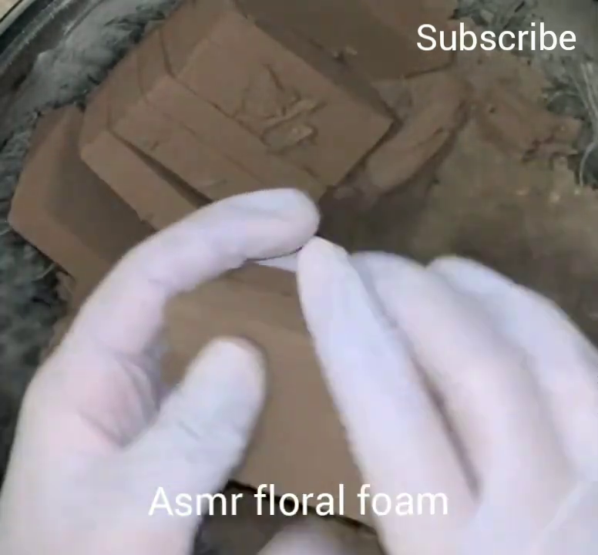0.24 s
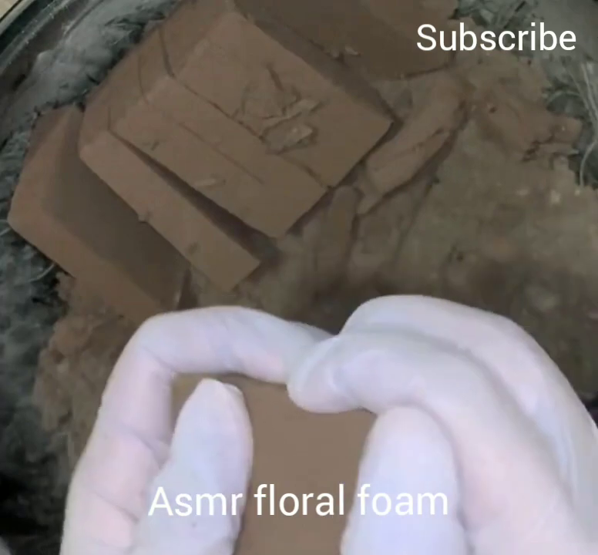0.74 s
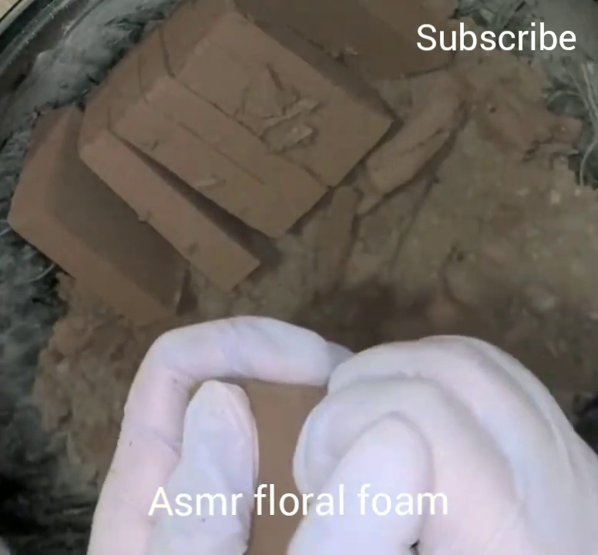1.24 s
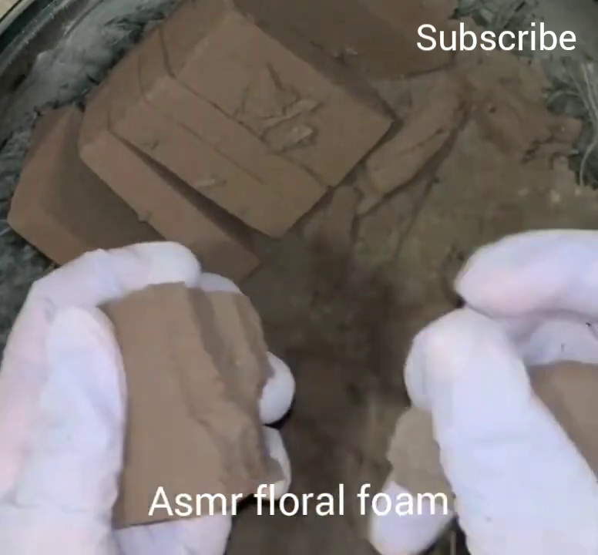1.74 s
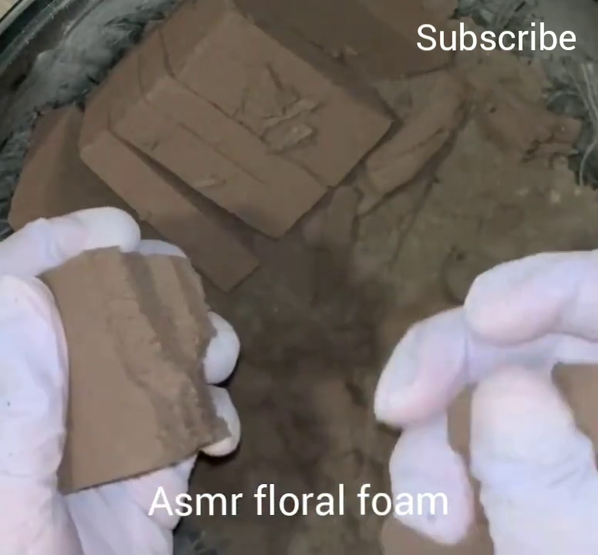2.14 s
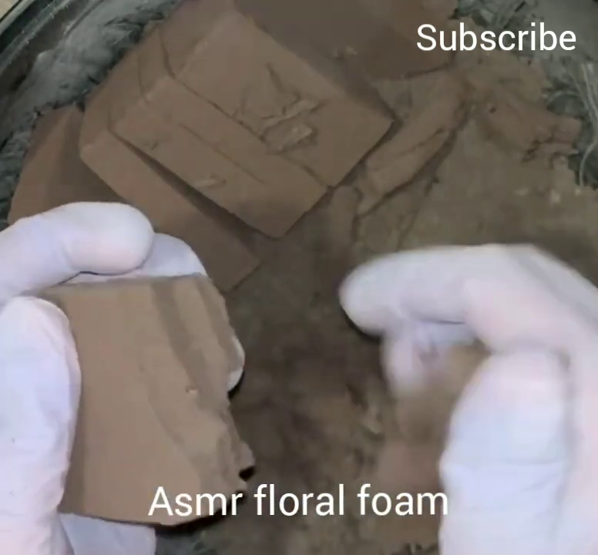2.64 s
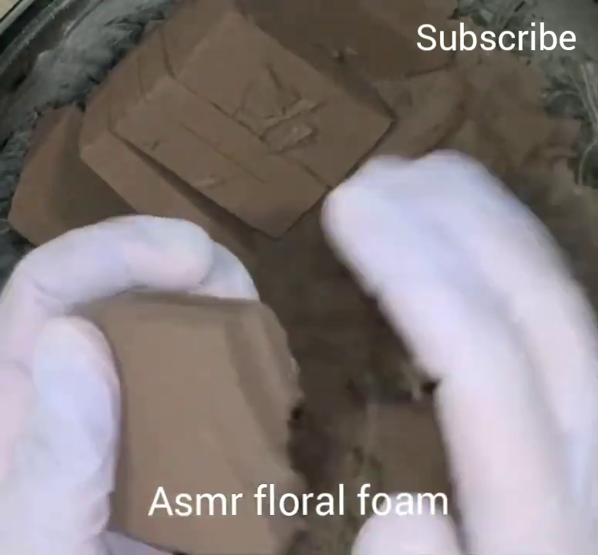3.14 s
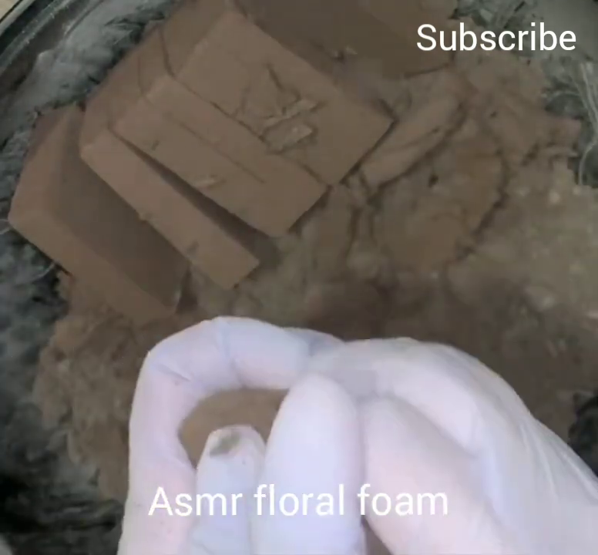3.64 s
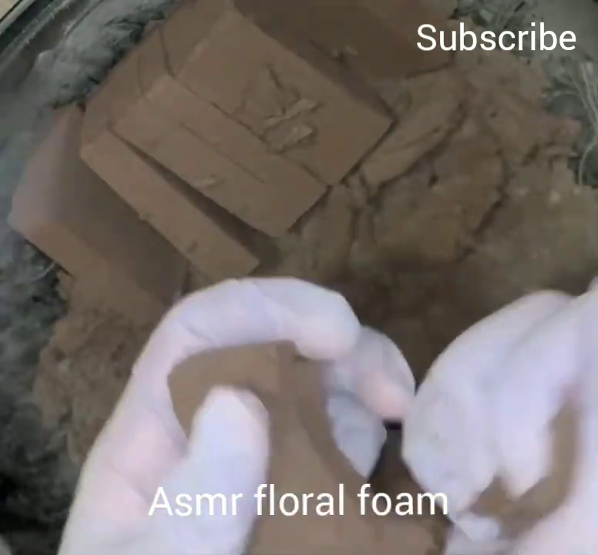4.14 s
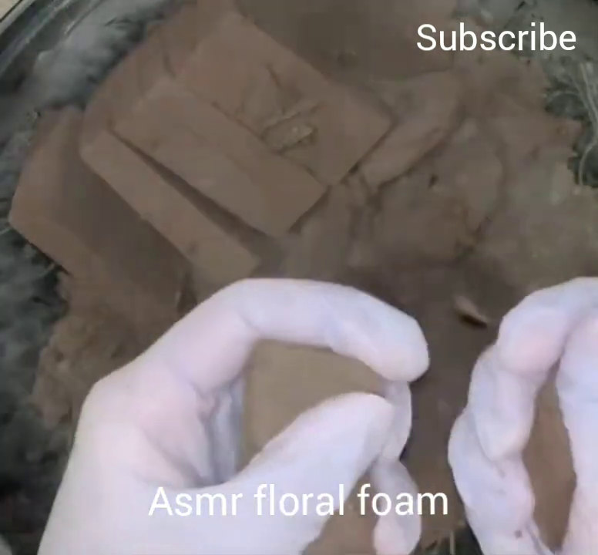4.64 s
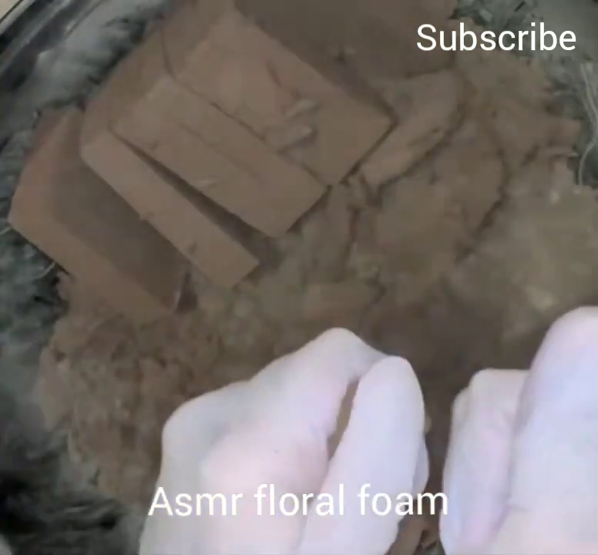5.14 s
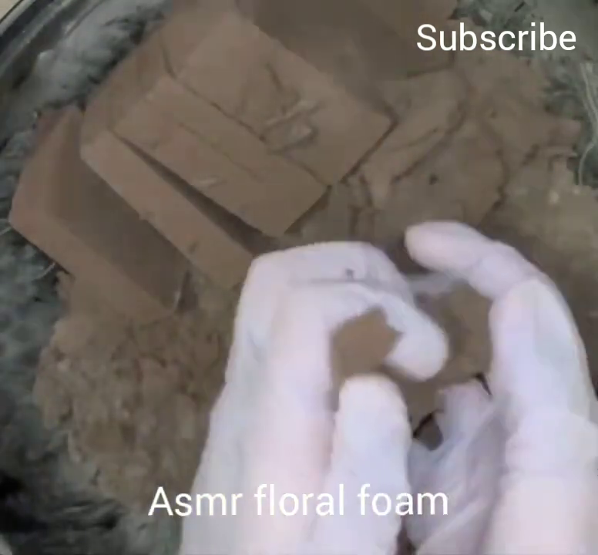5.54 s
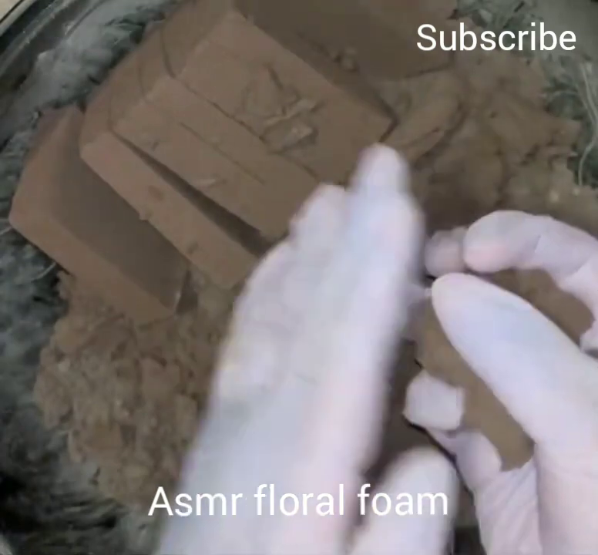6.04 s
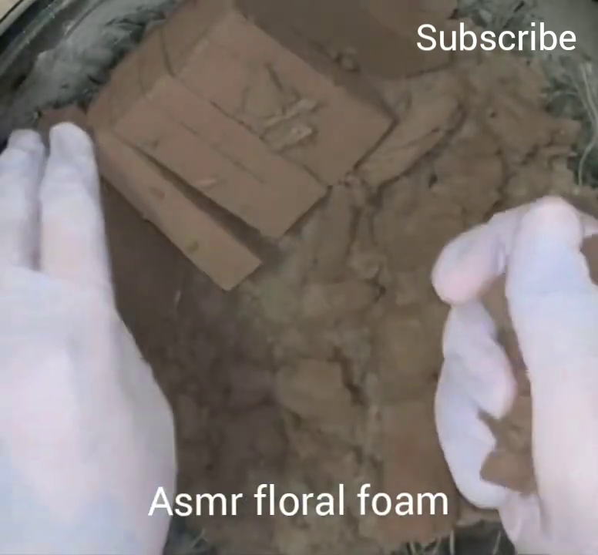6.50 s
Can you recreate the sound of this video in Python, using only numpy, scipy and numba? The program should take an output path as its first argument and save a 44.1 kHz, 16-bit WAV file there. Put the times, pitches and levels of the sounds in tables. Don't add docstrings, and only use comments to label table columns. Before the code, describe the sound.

Thousands of tiny brittle cell walls burst as fingers squeeze foam blocks on a table, making a gritty, hissy, wide crackle. Sharp bright snaps and dull knocks of breaking, dropping chunks poke through. Strong crunches come early, a short gap falls before the middle, then harder distorted crunches follow, easing into sparse rustling and a final squeeze. Close, dry indoor sound with soft low thumps and a distant motor.

```python
import sys
import numpy as np
from scipy import signal
from scipy.fft import rfft, irfft
from scipy.io import wavfile
from scipy.ndimage import uniform_filter1d
from numba import njit

SR = 44100
rng = np.random.default_rng(int(sys.argv[2]) if len(sys.argv) > 2 else 0)


def generate_wav(signal):
    frames = np.transpose(np.atleast_2d(signal))
    scaled = np.clip(frames, -1, 1) * 32767
    pcm = np.round(scaled).astype(np.int16)
    wavfile.write(sys.argv[1], SR, pcm)


def boost_factor(decibels):
    exponent = np.asarray(decibels, float) / 20
    return 10 ** exponent


N = 298557


def cells(count=120000):
    place, pitch, luck = rng.random((3, count))
    at = place * (N - 1)
    now = at.astype(int)
    hz = 150 * (17000 / 150) ** (pitch ** .55)
    t60 = np.clip(16 * boost_factor(3.5 * rng.standard_normal(count)), 5, 40) / hz
    crowd = pitch ** .45 + .02
    burst_db = np.minimum(-1.8 * np.log(1 - luck), 9)
    size = boost_factor(burst_db) * np.sqrt(hz / crowd / t60)
    patches = np.array([walk(10) for _ in range(42)])
    band = (6 * np.log2(hz / 150)).astype(int)
    lean_db = grip_db(at, hz) + 1.6 * patches[band, now]
    effort = np.sqrt(presses()[0] * boost_factor(1.1 * walk(22.34)) ** 2 + slips())
    even_crackle = foam_colour(rings(at, hz, t60, size))
    scale = boost_factor(2.5) / np.sqrt(np.mean(even_crackle ** 2))
    played = scale * size * boost_factor(lean_db) * effort[now]
    return foam_colour(at_ports(at, hz, t60, played, spread=.35, late_s=.004, wet_db=-1.))


# t/s of the peak, level/dB, swell/(ms
# per 20 dB), fade/(ms per 20 dB), crunch depth/dB
PRESSES = [(0.014, -17.0, 72.5, 61.5, -2), (0.699, -16.5, 128.5, 361, 5), (0.828, -10.5, 211, 308.5, 3.5),
           (0.935, -14.5, 260.0, 240.5, 8), (1.048, -12, 338.5, 30.0, 2.0), (1.168, -6.0, 473, 90.5, 2),
           (1.253, -15.5, 90.0, 68.5, -2.5), (1.721, -18, 300.5, 70.0, 3.5),
           (1.966, -13, 343.5, 39.5, -2.5), (2.03, -13.5, 150, 251, 0.5), (2.1, -15.5, 199.5, 201, -3.5),
           (2.18, -18, 199.5, 92, 3), (2.288, -19, 73, 171, -0.5), (3.216, -14, 47.5, 51.5, -9),
           (3.347, -9.5, 161.5, 317.5, 3.5), (3.459, -5, 234.5, 84, 3.5), (3.633, -8.5, 289.5, 92.5, 2.0),
           (3.932, -15.5, 255.5, 25.5, 0.5), (4.531, -5.5, 361.5, 243, -1), (4.693, -8, 162, 335.5, -3),
           (4.922, -13.5, 182, 176.5, 4.5), (6.075, -17.5, 161.5, 329, 2.5),
           (6.232, -14.0, 359, 190.0, 0.5), (6.447, -15.5, 278.5, 129.5, -0.5),
           (0.057, -20.5, 301, 59, 0), (0.187, -26, 168, 140.5, -4), (0.266, -22.5, 81, 68.5, -0.5),
        (0.331, -22.5, 160.5, 157, -1.5), (0.477, -25.5, 27.5, 790.0, -3.5), (0.546, -22.0, 70.0, 692, -3),
        (1.337, -24, 98.5, 26, 4.5), (1.518, -24.0, 229, 90.0, 3), (2.404, -27, 29.5, 361.5, -1),
        (2.64, -25.5, 87.5, 132.5, 0), (3.018, -23.5, 153, 80.0, 0), (3.138, -19, 46.5, 56, -4),
        (4.086, -23.5, 140.0, 30.0, -3), (4.189, -25.5, 93.5, 150.5, -2), (5.093, -26.5, 780.0, 73.5, 10.5),
        (5.326, -26, 135, 148.5, 4.5), (5.542, -27.5, 542, 35.5, 3), (5.726, -24, 450.0, 241, -1.5),
        (5.95, -25, 60.0, 48, 5), (6.598, -23.5, 59, 259.5, 3.0), (6.753, -20.5, 89, 90.0, 1.5)]
RUSTLE_DB = -54.5


def presses():
    s, db, swell, fade, depth = np.array(PRESSES).T[:, :, None]
    t = np.arange(0, N + 64, 64) / SR
    slope_ms = np.maximum(np.where(t < s, swell, fade), 15)
    each = boost_factor(db - 20 * 1000 * np.abs(t - s) / slope_ms) ** 2
    each = uniform_filter1d(each, 8)
    power = each.sum(axis=0) + boost_factor(RUSTLE_DB) ** 2
    mean_depth = (each * depth).sum(axis=0) / power
    return [np.interp(np.arange(N) / SR, t, v) for v in (power, mean_depth)]


# t/s, level/dB
SLIPS = [(0.477, -8.5), (0.5173, -2.5), (0.6157, -2), (0.6519, -4.5), (0.7214, 3.5), (0.7512, -0.5),
         (0.9024, 9.5), (1.4202, -10.5), (1.501, -11.5), (1.6521, -13.5), (1.698, -8.5), (2.2792, -7),
         (2.5596, -18), (2.9547, -18.5), (2.9956, -5), (3.1033, -10), (3.121, -5), (3.5606, 9),
         (3.6164, 18), (4.306, -5), (4.3518, 4.5), (4.8903, 12), (4.9422, 1.5), (5.1721, -14.5),
         (5.238, -12), (5.438, -8), (5.501, -7.5), (6.0337, 3.5), (6.2257, 0.5), (6.7321, -10.5)]
SLIP_T60_S = 0.052


def slips():
    power = np.zeros(N)
    for s, db in SLIPS:
        start = int(s * SR)
        t = np.arange(N - start)[:SR // 4] / SR
        shape = (1 - np.exp(-t / 0.0026)) * np.exp(-2 * np.log(1000) * t / SLIP_T60_S)
        power[start:][:len(t)] += boost_factor(db - 10.5) ** 2 * shape
    return power


COARSE_PER_DB, CRUNCH_PER_DB, THUD_PER_DB, THUD_LAG_PER_DB, USUAL_DB = 0.44, 1.34, 1.43, -0.22, -25.5


def grip_db(at, hz):
    power, depth = (v[at.astype(int)] for v in presses())
    coarse, crunch = COARSE_PER_DB * depth, CRUNCH_PER_DB * depth
    thud = THUD_PER_DB * depth + THUD_LAG_PER_DB * (10 * np.log10(power) - USUAL_DB)

    def below(edge_hz):
        return np.clip(2 * np.log2(edge_hz / hz) + .5, 0, 1)

    return below(6200) * coarse + below(2900) * (crunch - coarse) + below(1050) * (thud - crunch)


# f/Hz, level/(dB per Hz)
CELLS = [(88, -37.5), (150, -8), (290, -4.5), (480, -9), (860, -7), (1080, -14.5), (1570, -5), (2060, -6),
         (2400, -1), (2860, -3.5), (4930, 0.5), (5430, -2), (7550, 1), (8990, 0), (15500, 0.5)]
# f/Hz, width/Hz, level/dB
HOLLOWS = [(1584, 110, 3.5), (2260, 420, 1), (4050, 89, 7.5), (5060, 130, 3.5), (7150, 400, 1.5),
           (8870, 630, 5), (10170, 390, 2), (12400, 590, -2)]


def foam_colour(x):
    hz = np.fft.rfftfreq(N, 1 / SR) + 1
    peaks_db = sum(db / (1 + (2 * (hz - f) / width) ** 2) for f, width, db in HOLLOWS)
    return irfft(rfft(x) * boost_factor(along(CELLS, hz) + peaks_db), N)


# t/s, level/dB
SNAPS = [(0.0586, -10.5), (0.1547, -16), (0.4758, -15), (0.5641, -7), (0.6191, -7), (1.2578, 0.5),
         (1.4365, -12.5), (1.6531, 0.5), (1.7608, 1), (1.816, -9), (1.8882, 1.5), (1.9207, -6),
         (2.2823, -2.5), (2.3198, -11.5), (2.6344, -15), (3.7134, -5.5), (4.0367, -8.5), (4.2834, -7),
         (5.0053, -1), (5.1328, -15), (5.3194, -18.5), (5.4399, -11.5), (5.6872, -13), (5.7622, -6.5),
         (6.035, -0.5), (6.0817, -3), (6.1487, -6), (6.353, -11), (6.4158, -3), (6.5785, -12.5)]


def snaps():
    s, db = np.repeat(SNAPS, 4, axis=0).T
    hz = np.tile([3200., 5500., 8800., 13000.], len(SNAPS)) * boost_factor(1.2 * rng.standard_normal(len(s)))
    size = boost_factor(db - 10 - 3 * (hz > 10000))
    return at_ports(s * SR, np.minimum(hz, 15000), 4.5 / hz, size, spread=.2, late_s=.002, wet_db=-6.)


# t/s, level/dB, f/Hz, t60/s
KNOCKS = [(0.02, -16, 593, 0.07), (0.472, -23, 509, 0.018), (0.618, -20, 680, 0.035),
          (0.652, -17.5, 753, 0.053), (0.84, -11, 578, 0.03), (0.903, -4.5, 1520, 0.03),
          (0.992, -8.5, 818, 0.023), (1.043, -11.5, 884, 0.056), (1.103, -10, 533, 0.071),
          (1.149, -25, 1457, 0.024), (1.333, -8.5, 668, 0.026), (1.525, -31, 418, 0.027),
          (1.695, -14.5, 740, 0.047), (2.197, -15.5, 500, 0.068), (2.948, -40.5, 493, 0.036),
          (3.275, -16, 867, 0.034), (3.565, -18, 1324, 0.025), (3.607, -9, 393, 0.071),
          (4.275, -22, 401, 0.018), (4.443, -28, 1490, 0.027), (4.512, -19.5, 528, 0.025),
          (4.534, -9.5, 633, 0.086), (4.69, -7.5, 406, 0.042), (4.89, -12.5, 404, 0.024),
          (5.081, -11.5, 544, 0.042), (5.457, -19.5, 1310, 0.041), (5.686, -19.5, 610, 0.022),
          (5.736, -32, 401, 0.026), (6.031, -18.5, 1040, 0.045), (6.363, -30, 447, 0.042)]


def knocks():
    s, db, hz, t60 = np.repeat(KNOCKS, 6, axis=0).T
    ratio = np.tile([1., .6, 1.9, 2.2, 4.0, 1.3], len(KNOCKS))
    part_db = np.tile([0, -4, -1, -1, -4, -11], len(KNOCKS))
    after_s = np.tile([0, .0003, .0002, .0001, .0004, .009], len(KNOCKS))
    at = (s + after_s) * SR
    part_t60 = np.maximum(t60, .003) * .22 / ratio
    return at_ports(at, hz * ratio, part_t60, boost_factor(db + part_db - 6), spread=.5, late_s=.006, wet_db=-8.)


# t/s, drawn right/(0-1), extra scatter level/dB while they cup the block
HANDS = [(0, 0.6, 2), (.45, 0.4, 2), (.7, .1, 7.5), (1.25, 0.2, 1.5), (1.45, 0, 1.5), (2.35, -.1, -0.5),
         (2.6, 0.9, 4), (3.05, 0.4, 0.5), (3.4, 0, 5), (3.75, 0, 9.5), (4.2, 0.4, 2.5), (4.6, 0.4, 1.5),
         (5.0, -.1, -1), (5.25, .3, 4.5), (5.8, 1, 1), (6.3, 1.1, -1), (6.77, 1.2, 1)]
# f/Hz, left lead/samples with hands at the block, left lead/samples with hands drawn right
PORTS = [(300, 2, 3), (700, 2, 2), (1030, 6, 4), (1400, 10.7, 9.7), (2100, 10.2, 7.8), (2750, 9.4, 7.4),
         (3300, 11, 5.8), (4100, 9.8, 7), (5200, 8.5, 6.4), (6700, 6.7, 6.5), (7600, 8.7, 7.9),
         (10000, 8.3, 7), (13000, 7, 6.7), (14000, 8, 7.5)]
# f/Hz, level/dB over the straight path
SCATTER = [(200, -7), (700, -6), (1400, -7), (2100, -7), (2500, -3.5), (2950, -5), (3500, -2.5), (7000, -3),
           (12000, -1)]


def at_ports(at, hz, t60, size, spread, late_s, wet_db):
    s, *place = np.transpose(HANDS)
    drawn, cupped_db = (np.interp(at / SR, s, v) for v in place)
    chance = rng.standard_normal((2, len(at)))
    wait = late_s * SR * rng.exponential(size=(2, len(at)))
    lead = (1 - drawn) * along(PORTS, hz) + drawn * along(PORTS, hz, column=2) + spread * chance[0]
    pan = boost_factor(-0.35 + 1.54 * chance[1])
    patches = np.array([walk(16) for _ in range(32)])
    band = np.clip(4 * np.log2(hz / 100), 0, 31).astype(int)
    bounce = boost_factor(along(SCATTER, hz) + wet_db + cupped_db + 4.0 * patches[band, at.astype(int)])
    straight = size / np.sqrt(1 + bounce ** 2)
    left = rings(at, hz, t60, straight * pan) + rings(at + wait[0], hz, t60, straight * bounce * pan)
    right = rings(at + lead, hz, t60, straight / pan) + rings(at + wait[1], hz, t60, straight * bounce / pan)
    return np.array([left, right])


@njit
def rings(at, hz, t60, size):
    out = np.zeros(N)
    for g in range(len(at)):
        rate = np.log(1000) / t60[g] / SR
        s = 2j * np.pi * hz[g] / SR - rate
        first = int(np.ceil(at[g]))
        z = size[g] * np.e * rate * np.exp(s * (first - at[g]))
        turn = np.exp(s)
        for k in range(max(first, 0), min(N, first + int(t60[g] * SR * 1.2) + 1)):
            out[k] += z.imag * (k - at[g])
            z *= turn
    return out


def along(table, hz, column=1):
    table = np.array(table)
    return np.interp(np.log(hz), np.log(table[:, 0]), table[:, column])


def walk(rate):
    k = int(SR / rate)
    held = np.repeat(rng.standard_normal(N // k + 1), k)
    return 1.218 * uniform_filter1d(uniform_filter1d(held, k), k)[:N]


# f/Hz, level/(dB per Hz)
ROOM = [(12, -40), (20, -20.5), (59, -2), (146, -3), (242, 1.5), (323, -2), (380, -7), (424, -3.5),
        (857, -15), (1050, -45), (1500, -14.5), (1950, -45.5), (3300, -120)]
ROOM_DB = -41
# f/Hz, level/dB rms
MOTOR = [(62, -50), (124, -51.5), (186, -49.5), (247.6, -43), (371.4, -46)]


def room():
    hz = np.fft.rfftfreq(N, 1 / SR) + 1
    t = np.arange(N) / SR
    mid, side = irfft(rfft(rng.standard_normal((2, N))) * boost_factor(along(ROOM, hz)), N)
    rumble = unit(mid + .38 * side * np.array([[1], [-1]]))
    deep = irfft(rfft(rumble) / (1 + (hz / 170) ** 6), N)
    flutter = boost_factor(3.0 * walk(6))
    rumble = flutter * (rumble - deep) + sway() * deep
    drift = np.cumsum(0.00622 * walk(4)) / SR
    hum = np.zeros(N)
    for f, db in MOTOR:
        hum += np.sqrt(2) * boost_factor(db + 1.2 * walk(8)) * np.sin(2 * np.pi * f * (t + drift))
    return boost_factor(ROOM_DB + 2.5) * rumble + hum


def unit(x):
    return x / np.sqrt(np.mean(x ** 2))


# t/s, level/dB over rest, width/s
SWELLS = [(.02, 9.5, 0.057), (.66, 5, .1), (1.08, 9.5, .12), (1.98, 2, .05), (2.2, 9, .04), (3.25, -11, .1),
          (4.15, -5, .15), (4.75, -14, .1), (5.0, 12, 0.11), (5.7, 5, .1), (6.05, -8, .08), (6.25, 5, .08),
          (6.5, 10.5, 0.21)]
SWAY_REST_DB, SWAY_PRESS_DB, SWAY_SLEW_S = 0, 16.5, 0.042


def sway():
    t = np.arange(N) / SR
    pressed = uniform_filter1d(presses()[0], int(SWAY_SLEW_S * SR)) * boost_factor(SWAY_PRESS_DB) ** 2
    swell_db = sum(db * np.exp(-((t - s) / width) ** 2) for s, db, width in SWELLS)
    return np.sqrt(boost_factor(SWAY_REST_DB + swell_db) ** 2 + pressed)


def scene():
    return cells() + snaps() + knocks() + room()


def roll_off(x):
    return signal.sosfilt(signal.butter(12, 15620, fs=SR, output="sos"), x)


CUT_S, RESTART_S, BRIGHT_S, DULL_HZ = 2.672, 2.9474, 3.128, 9750


def record(dry):
    t = np.arange(N) / SR
    overloaded = np.clip(dry, -1.1, 1.1)
    x = signal.sosfilt(signal.butter(2, 30, "high", fs=SR, output="sos"), overloaded)
    dull = signal.sosfilt(signal.ellip(10, .2, 90, DULL_HZ, fs=SR, output="sos"), x)
    top = np.where(t < RESTART_S - .1, 1, np.clip((t - BRIGHT_S) / .025 + .5, 0, 1))
    x = dull + top * (x - dull)
    fade = np.clip((CUT_S - t) / .018, 0, 1) ** 1.5
    x = x * np.where(t < RESTART_S, fade, 1)
    return roll_off(x)


dry = scene()
out = record(dry)
generate_wav(out)
```